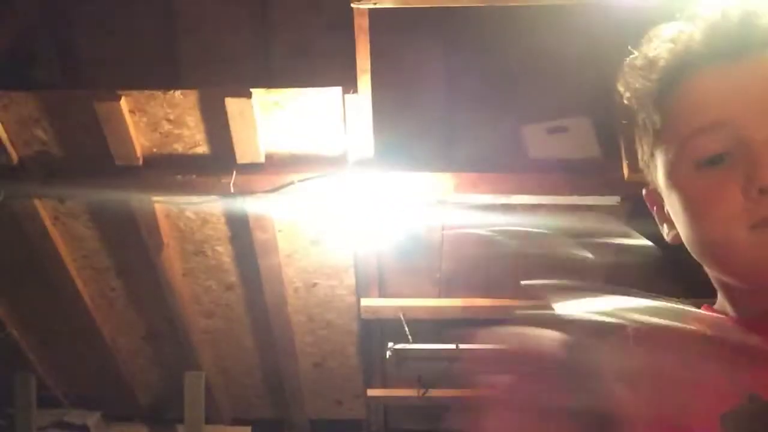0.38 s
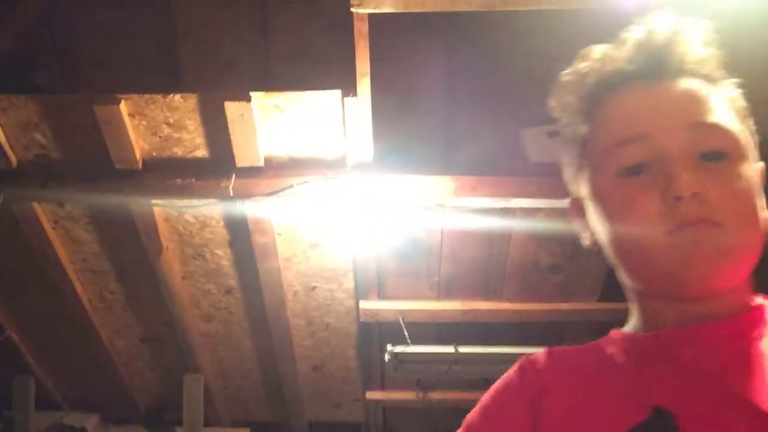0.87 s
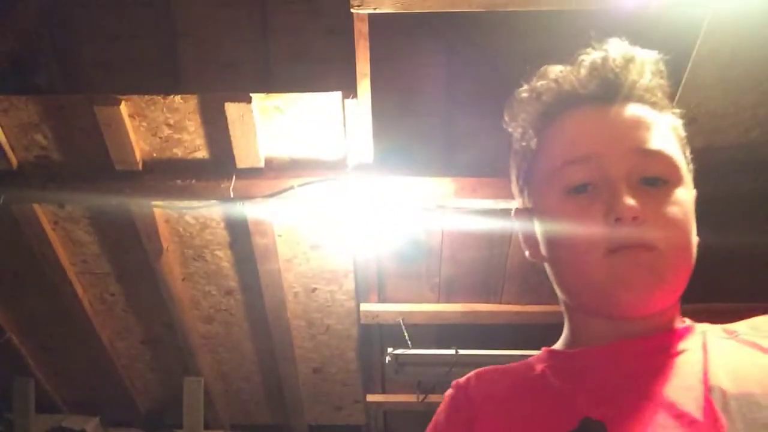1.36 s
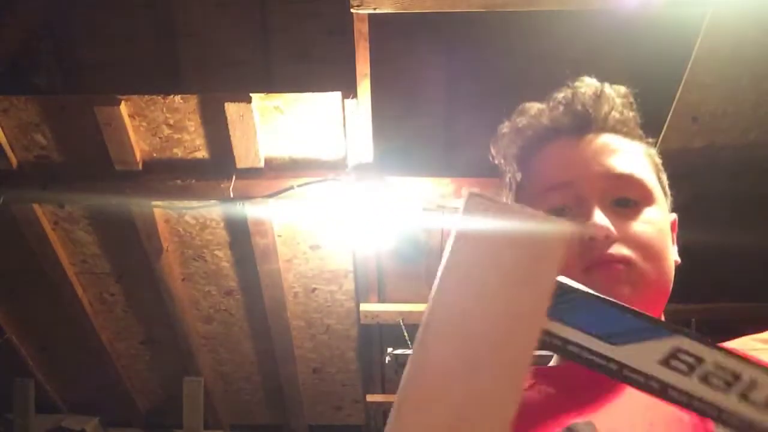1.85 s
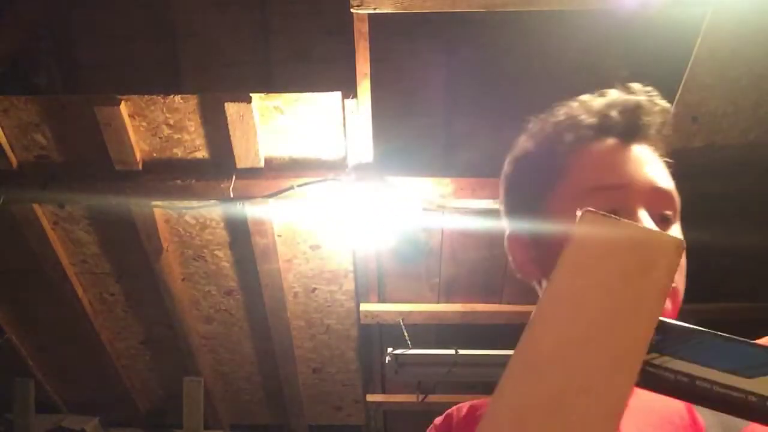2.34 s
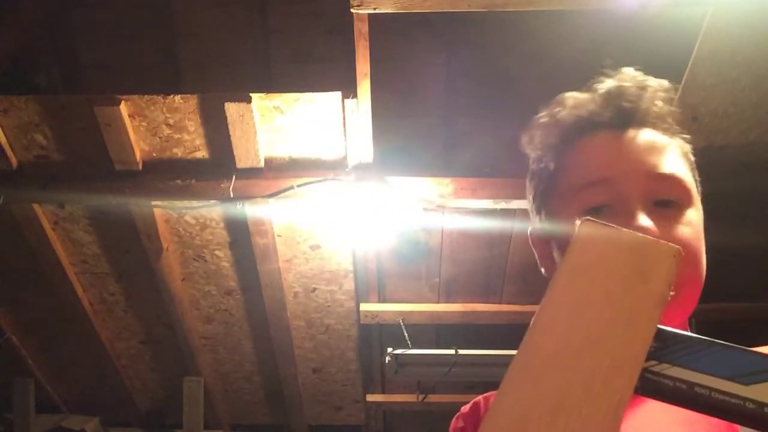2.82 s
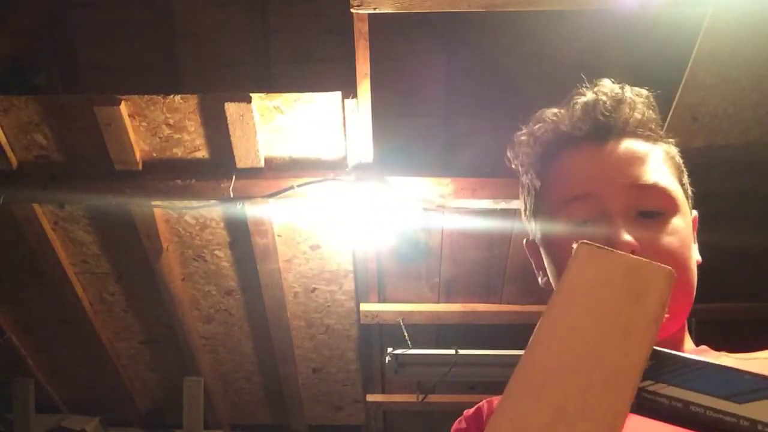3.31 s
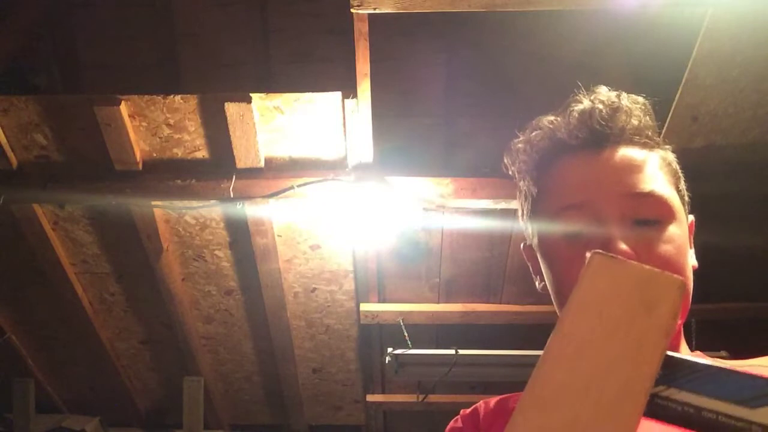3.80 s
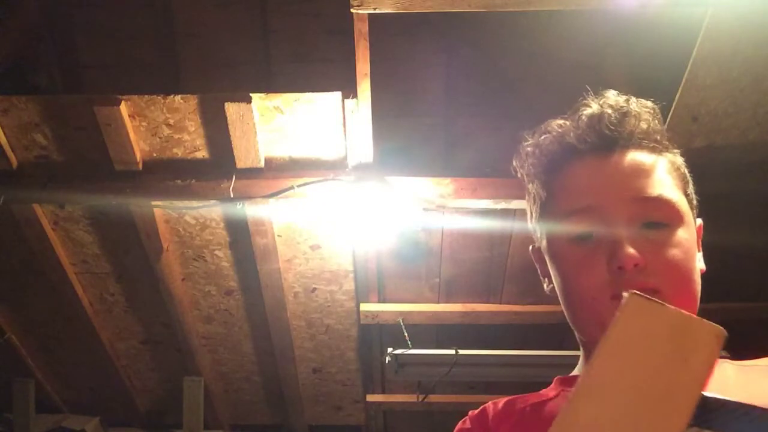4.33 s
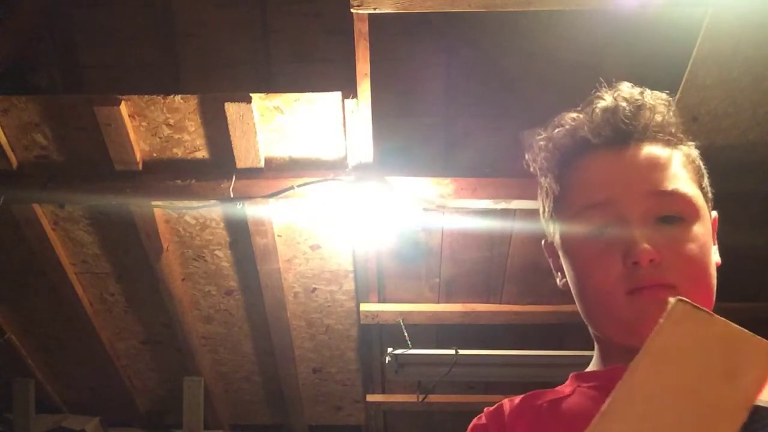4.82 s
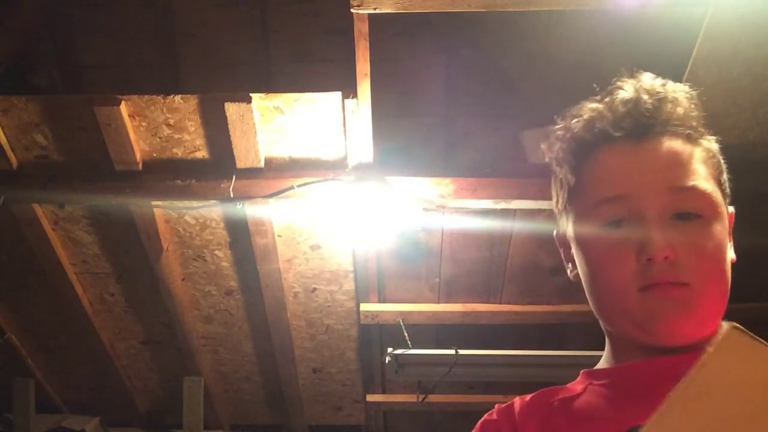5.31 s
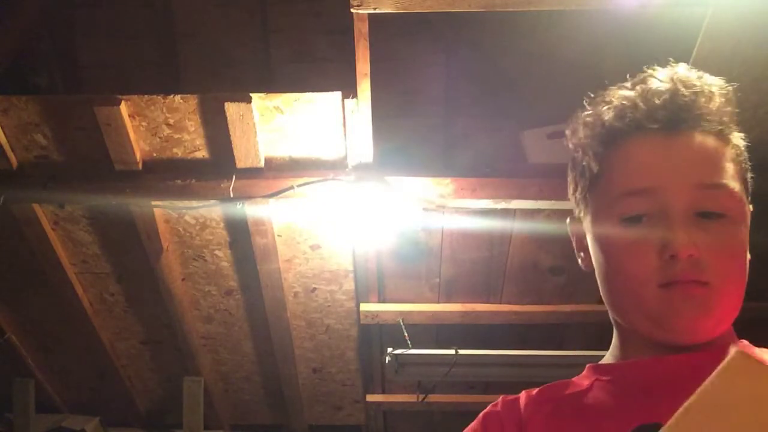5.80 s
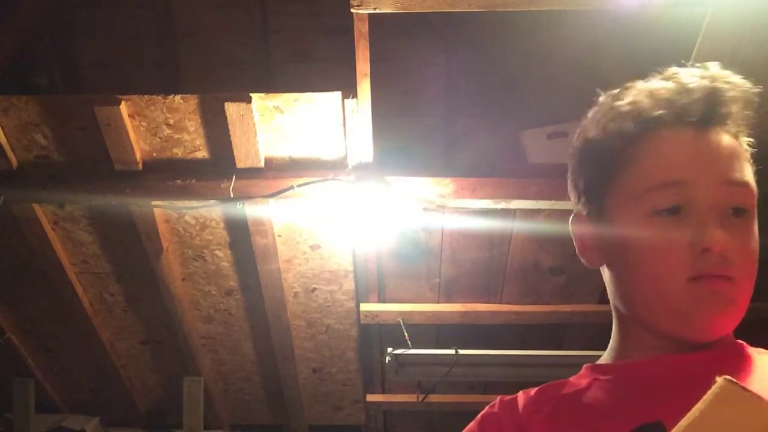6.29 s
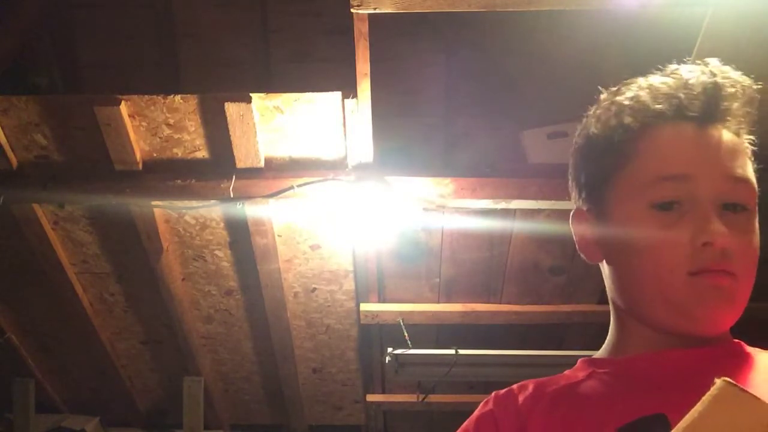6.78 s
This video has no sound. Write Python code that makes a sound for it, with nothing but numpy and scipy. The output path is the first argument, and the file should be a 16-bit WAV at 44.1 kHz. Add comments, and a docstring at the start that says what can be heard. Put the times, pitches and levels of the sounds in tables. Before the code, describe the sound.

A loud wooden knock starts immediately at 0.0 s, bouncing in fading hits until about 0.2 s with gritty rattle and high metallic ticks. A harder, brighter cluster cracks at 0.3-0.45 s, jangling away by 0.65 s. A light hollow ping comes near 0.8 s, then a third, heavier and duller cluster at 0.9-1.2 s, with bench thuds and weaker knocks around 1.3-1.4 s. Quiet rubbing and tiny taps follow; faint metal ticks and scraping at 2.15-2.3 s lead into a sharp, tight group of knocks at 2.35 s. Near silence until 3.5 s, then a small tap at 3.7 s, faint slides and padded bumps at 4.1-4.4 s, a soft thud at 5.05 s, light rubs, and a short slide ending in a clear double knock at 5.84 s. A tiny tap at 6.06 s, then only faint room air and low hum. Close, dry, short timber-room reverberation.

```python
"""A shaking bench is at once struck by knocks of a hammer and a wooden block, which bounce and rattle.
Blows and taps are sums of damped modes; rubbing and rattling drive the same modes with gritty noise.
A loose metal part ticks, a hollow handle pings and padded bumps thud as the block is rubbed and set down.
A timber workshop answers with decaying noise tails over faint air noise and a low hum."""
import sys
import numpy as np
from scipy import signal
from scipy.fft import rfft, irfft, next_fast_len
from scipy.io import wavfile
from scipy.ndimage import uniform_filter1d, minimum_filter1d, map_coordinates

SR = 44100
rng = np.random.default_rng(int(sys.argv[2]) if len(sys.argv) > 2 else 0)


def materialize(psi):
    """Save the field psi as 16-bit PCM at rate SR to the path in sys.argv[1].

    A 1-D psi becomes a single channel; in a 2-D psi each row is a channel.
    """
    bounded = np.clip(np.atleast_2d(psi).T, -1, 1)
    quanta = np.round(bounded * 32767).astype(np.int16)
    wavfile.write(sys.argv[1], SR, quanta)


def undo_db(level):
    """Turn decibels back into plain size, where 20 dB means ten times bigger."""
    steps = np.asarray(level, float) / 20
    return 10 ** steps


N = 315342

# contacts: (time [s], block peak [dB], bench thud [dB re block], upper-mode crack [dB re block],
# sizzle [dB re block, before its burst envelope])
CONTACTS = [(0.01, 0, -5.5, -7.5, -28.5), (0.047, -6.5, -7, -4, -19.5), (0.091, -12.5, -4.5, -8, -21.5),
            (0.104, -9, -7, -21.5, -25), (0.124, -16, -3, -10, -24), (0.171, -15, -5.5, -21, -32.5),
            (0.213, -22, -0.5, -5, -35), (0.293, -33.5, -25.5, 0, -23), (0.304, 1.5, -14, -1, -11),
            (0.343, 0, -6, -5, -28.5), (0.369, 6, -3.5, -4.5, -22.5), (0.412, -11, -12.5, -3, -16),
            (0.453, -4, -7, -16.5, -28.5), (0.516, -20.5, 3, -8.5, -26.5), (0.576, -24, 0.5, -6, -29),
            (0.636, -32.5, -30, 3.5, -34), (0.759, -32.5, -1, -9.5, -40.5), (0.886, -4.5, -2.5, -15.5, -34),
            (0.908, 1, -0.5, -13, -27), (0.952, 3, -6.5, -6.5, -22.5), (1.001, 2, -7.5, -12.5, -29.5),
            (1.03, -2, -12, -15, -35), (1.117, -13, -5.5, -16, -41.5), (1.137, -6.5, -9, -22.5, -47.5),
            (1.165, -11, -5.5, -18.5, -39), (1.224, -17.5, -3, -32, -43.5), (1.267, -29, -3, -24.5, -31.5),
            (1.32, -5.5, -8, -15.5, -41.5), (1.356, -10.5, -0.5, -39, -51.5), (1.381, -20, 10, -47, -61),
            (1.408, -13.5, -3, -32, -62), (1.533, -41.5, -6, -10, -28), (2.292, -52.5, -28, 12, -16.5),
            (2.336, -40.5, -23, 0, -30.5), (2.351, -41.5, -15, 8, -16), (2.359, -7, -4, -3.5, -33),
            (2.372, -5, -14.5, -19.5, -30.5), (2.384, -22, -20, -25, -23.5),
            (3.657, -40.5, -14, -16, -23.5), (3.708, -32.5, -1, -11, -31.5), (5.057, -36, 7.5, -20, -48),
            (5.721, -46, 15.5, -29, -26), (5.835, -4.5, -7.5, -27, -40), (5.841, -7, -13.5, -18.5, -20),
            (6.057, -44, -17, -28.5, -43.5)]
# modes of the wooden block: (frequency [Hz], relative level [dB], t60 [s])
BLOCK_MODES = [(299.5, -3.5, 0.032), (427, 2.5, 0.038), (483, -11.5, 0.023), (532, -5.5, 0.1),
               (685, -0.5, 0.015), (759, 0.5, 0.043), (857, -3.5, 0.062), (911, -4, 0.07),
               (1023.3, -5.5, 0.08), (1145, -6, 0.11), (1246.2, -2.5, 0.04), (1476, -12.5, 0.044)]
# low modes of the bench: (frequency [Hz], relative level [dB], t60 [s])
BENCH_MODES = [(78.6, -8, 0.19), (115.57, -6, 0.22), (159.4, 1.5, 0.086), (206.6, 6, 0.13),
               (247.4, 2, 0.059)]
# upper modes that hard contact wakes: (frequency [Hz], relative level [dB], t60 [s])
UPPER_MODES = [(1471, 0.5, 0.1), (1639, 2, 0.095), (1750, -4, 0.035), (1840, 4.5, 0.058), (2000, 2, 0.056),
               (2206, -1, 0.049), (2420, -2, 0.058), (2666, -11, 0.046), (2954, -10, 0.023),
               (3666, -18.5, 0.018)]
# spectrum of the sizzle and rubbing fizz: (frequency [Hz], relative density [dB per Hz])
FIZZ_SPECTRUM = [(1470, -29), (2500, -3.5), (2980, -9.5), (3440, -8), (4040, -8.5), (5440, -6.5),
                 (6150, -11.5), (7450, -14), (8480, -23), (9430, -26), (15500, -35.5)]


def unit(x):
    """Normalisation: a signal divided by its root mean square has rms 1."""
    return x / np.sqrt(np.mean(x ** 2) + 1e-20)


def along(points, hz):
    """Interpolation on a logarithmic frequency axis of (frequency [Hz], value) points."""
    f, v = np.transpose(points)
    return np.interp(np.log(hz + 1), np.log(f + 1), v)


def filtered(x, response):
    """Linear filtering: the spectrum of x is multiplied by a complex response of frequency."""
    m = next_fast_len(x.shape[-1] + 8192)
    spectrum = rfft(x, m) * response(np.fft.rfftfreq(m, 1 / SR))
    return irfft(spectrum, m)[..., :x.shape[-1]]


def resonant(modes, blur):
    """Modal superposition: steady forcing excites resonances whose bandwidth varies inversely with t60."""
    low, high = 1.2 * modes[0][0], 0.92 * modes[-1][0]

    def response(f):
        total = 0
        for k, (centre, db, t60) in enumerate(modes):
            width = blur * np.log(1000) / np.pi / t60  # Hz; blur scales the free-ringing width
            damping = 1j * f * width
            total = total + (-1) ** k * undo_db(db) * damping / (centre * centre - f * f + damping)
        inside = 1 / (1 + (f / high) ** 4) / (1 + (low / (f + 1)) ** 4)  # weak outside the modes' range
        return inside * total
    return response


def ring(modes, t, attack, scatter_db, detune, chatter=.001):
    """Impulse excitation: modes of scattered strength and pitch decay freely, blurred by contact chatter.
    attack is a time constant [s], detune a fraction, chatter a t60 [s]; the peak is 1."""
    hz, db, t60 = np.transpose(modes)[:, :, None]
    strength, pitch = rng.standard_normal((2, len(modes), 1))
    sign = (-1) ** np.arange(len(modes))[:, None]
    envelope = sign * undo_db(db + scatter_db * strength - 60 * t / t60)
    wave = envelope * np.sin(2 * np.pi * hz * (1 + detune * pitch) * t)
    contact = 0.07 * rng.standard_normal(len(t)) * undo_db(-60 * t / chatter)
    contact[0] = 1
    onset = 1 - np.exp(-t / attack)
    wave = signal.fftconvolve(wave.sum(0) * onset, contact)[:len(t)]
    return wave / np.abs(wave).max()


def grit(per_second, spread_db):
    """Stick-slip friction: random tiny contacts of uneven size stand on a bed of noise."""
    hit = rng.random(N) < per_second / SR
    size = undo_db(spread_db * rng.standard_normal(N)) * rng.standard_normal(N)
    return unit(hit * size) + 0.98 * rng.standard_normal(N)


def spells(rows, t, rise_db, release, grip=2499.5, upper_db=-4):
    """Power envelope: each spell sets in fast, changes evenly in dB and lets go, in all five parts.
    grip and release are slopes [dB/s]; parts are bench, low block, high block, upper modes and fizz."""
    power = np.zeros((5, N))
    for start, end, db, bench_db, fizz_db in rows:
        span = slice(max(round(start * SR) - SR // 10, 0), round(end * SR) + SR // 4)
        now = t[span]
        # a rising spell is levelled at its end, any other at its start
        along_spell = np.clip((now - start) / (end - start), 0, 1) - (rise_db > 0)
        before, after = np.maximum(start - now, 0), np.maximum(now - end, 0)
        shape_db = rise_db * along_spell - grip * before - release * after
        # the upper modes follow 0.29 of the fizz's change
        parts_db = np.array([[bench_db], [-2.5], [-3.5], [upper_db + 0.29 * fizz_db], [fizz_db]])
        power[:, span] += undo_db(db + parts_db + shape_db) ** 2
    return power


def rattle_power(t):
    """Exponential decay: loose parts lose the energy a knock left in bench, block, upper modes and fizz."""
    # bench, low block, high block, upper modes, fizz:
    # (rms level under that part of the knock [dB], decay [dB/s])
    decay_law = [(-14, 201), (-16, 210.5), (-18, 300), (-18.5, 261), (-7.5, 332)]
    power = np.zeros((5, N))
    under_db, dying = np.transpose(decay_law)[:, :, None]
    for s, db, thud_db, crack_db, sizzle_db in CONTACTS:
        span = slice(round(s * SR), round(s * SR) + SR // 2)
        start_db = db + np.array([[thud_db], [0], [0], [crack_db], [sizzle_db]]) + under_db
        power[:, span] += undo_db(start_db - dying * (t[span] - s)) ** 2
    return power


def rub_power(t):
    """Friction power under uneven hand pressure: strokes hold, slides swell and stop dead."""
    # even rubs or drags: (start [s], end [s], block level [dB], bench [dB re block], fizz [dB re block])
    strokes = [(.64, .75, -46.5, -0.5, -24), (.77, .86, -39, -1.5, -26.5), (1.19, 1.27, -35, 4, -48.5),
               (1.53, 1.575, -50.5, -7, -49), (1.6, 1.78, -57.5, 1.5, -44.5), (1.84, 1.97, -60, -8.5, -32),
               (1.98, 2.05, -68.5, -5.5, -2.5), (2.147, 2.225, -45, -5.5, -15),
               (2.226, 2.305, -46.5, -5, -23.5), (3.5, 3.64, -73.5, 5.5, -13.5),
               (3.665, 3.715, -63, 2, 7.5), (3.83, 3.855, -67.5, 4.5, 3.5), (4.135, 4.2, -63.5, 14.5, -18),
               (4.27, 4.31, -58, -5, -10.5), (4.32, 4.4, -58, 10.5, -19.5), (4.44, 4.58, -63.5, -9.5, -15),
               (4.66, 4.9, -62.5, 0.5, -14.5), (5.11, 5.24, -58.5, -4, -14.5),
               (5.3, 5.39, -58.5, -5.5, -17), (5.52, 5.645, -58.5, -0.5, -12), (5.715, 5.75, -56, 3, -28.5)]
    # slides: (start [s], end [s], block level at the end [dB], bench [dB re block], fizz [dB re block])
    slides = [(.282, .303, -33, 5.5, -10), (.845, .88, -36, 10, -22.5), (1.68, 1.825, -64.5, 3.5, 2.5),
              (3.9, 4.125, -55, -0.5, -18), (4.96, 5.055, -51.5, 12, -18), (5.745, 5.832, -35, 4, -16.5)]
    held = spells(strokes, t, rise_db=0, release=502.5)
    swelling = spells(slides, t, rise_db=17.5, release=2502)
    waver = map_coordinates(rng.standard_normal(1000), [t * 25])  # 25 random points per second
    return (held + swelling) * undo_db(1.5 * waver) ** 2


def rubbing():
    """Forced vibration: slips and loose parts drive the modes without pause; shaken or rubbed tools sizzle."""
    # where rubbed wood fizzes most: (frequency [Hz], width [Hz], level [dB, before an 8 dB lift])
    grain = [(3390, 230, 1), (7260, 56, 1.5), (5110, 59, -1.5), (5460, 100, -11.5), (5700, 220, 0),
             (6330, 130, -6), (9000, 130, -7.5), (10300, 170, -8.5), (10400, 220, -10)]
    # shaking left by heavy blows:
    # (start [s], end [s], block level at the start [dB], bench [dB re block], fizz [dB re block])
    shakes = [(0, .2, -8, 4, -17), (.305, .52, -9, -9.5, -15.5), (.887, 1.05, -12.5, 2.5, -28)]
    # spectrum of shaken metal: (frequency [Hz], relative density [dB per Hz])
    metal_spectrum = [(4000, -21), (8000, 5), (11000, -2), (15500, -9.5)]

    def fizz(f):
        peaks = sum(undo_db(db + 8) / (1 + ((f - c) / w * 2) ** 2) for c, w, db in grain)
        return undo_db(along(FIZZ_SPECTRUM, f)) * (1 + peaks)

    layers = [filtered(grit(300, 3), resonant(BENCH_MODES, blur=.9)),
              filtered(grit(600, 3), resonant(BLOCK_MODES[:7], blur=.9)),
              filtered(grit(600, 3), resonant(BLOCK_MODES[7:], blur=.9)),
              filtered(grit(800, 3), resonant(UPPER_MODES, blur=.8)),
              filtered(grit(2000, 3), fizz)]
    t = np.arange(N) / SR
    shake = spells(shakes, t, rise_db=-24, release=249.5, grip=SR, upper_db=-3.5)
    rub = rub_power(t)
    power = rattle_power(t) + rub + shake
    gain = uniform_filter1d(np.sqrt(power), size=130, axis=1, mode="nearest")
    driven = sum(g * unit(x) for g, x in zip(gain, layers))
    tools = unit(filtered(grit(3000, 2.5), lambda hz: undo_db(along(metal_spectrum, hz))))
    tools_gain = np.sqrt(shake[-1] + undo_db(1.5) ** 2 * rub[-1])  # follows the fizz
    return driven + undo_db(-8.5) * tools_gain * tools


def air():
    """Stationary random noise: shaped, slightly patchy room noise and a wavering narrow-band hum."""
    # room noise: (frequency [Hz], relative density [dB per Hz])
    room_spectrum = [(15, -62), (25, -25.5), (39, -14.5), (62, 1.5), (86, -10.5), (204, -14.5), (233, -17),
                     (281, -13.5), (340, -26), (368, -20.5), (761, -21.5), (1490, -33), (1710, -29),
                     (2620, -40), (15500, -50.5)]
    # hum: (frequency [Hz], 1/e half-width [Hz], rms level [dB])
    hum_bands = [(55, 6.8, -62)]
    z = signal.stft(rng.standard_normal(N), nperseg=512)[2]
    field = uniform_filter1d(rng.standard_normal(z.shape), 6, 0)  # smooth over frequency
    field = uniform_filter1d(field, 14, 1)  # then over time
    noise = signal.istft(z * undo_db(0.6 * unit(field)), nperseg=512)[1][:N]
    out = undo_db(-57) * unit(filtered(noise, lambda hz: undo_db(along(room_spectrum, hz))))
    for hz, width, db in hum_bands:
        hum = filtered(rng.standard_normal(N), lambda f: np.exp(-((f - hz) / width) ** 2))
        out += undo_db(db) * unit(hum)
    return out


def knocks():
    """Impact: each contact rings block and bench, with upper modes and a sizzle burst when hard."""
    out, t = np.zeros(N + SR), np.arange(SR // 4) / SR
    hiss = unit(filtered(rng.standard_normal(N + SR), lambda hz: undo_db(along(FIZZ_SPECTRUM, hz))))
    # a blow lifts the block modes over 900 Hz by 1 dB
    struck = [(hz, level + (hz > 900) * 1, t60) for hz, level, t60 in BLOCK_MODES]
    burst = 1.5 * undo_db(-60 * t / .02) + .4 * undo_db(-60 * t / .11)  # fast and slow decay
    for s, db, thud_db, crack_db, sizzle_db in CONTACTS:
        at = round(s * SR)
        blow = ring(struck, t, 0.00026, scatter_db=4.5, detune=0.017, chatter=0.062)
        thud = ring(BENCH_MODES, t, 0.002, scatter_db=4.5, detune=0.003, chatter=0.04)
        crack = ring(UPPER_MODES, t, 0.000072, scatter_db=3.5, detune=0.039, chatter=0.034)
        sizzle = burst * hiss[at:at + len(t)]
        blow += undo_db(thud_db) * thud + undo_db(crack_db) * crack + undo_db(sizzle_db) * sizzle
        out[at:at + len(t)] += undo_db(db) * blow
    return out[:N]


def shop(x):
    """Reverberation: walls return noise tails that decay by frequency, new every 1/8 s as things move."""
    # reverberation: (frequency [Hz], t60 [s])
    decay_times = [(100, 0.08), (400, 0.1), (1500, 0.32), (5000, 0.065), (12000, 0.6)]
    out, step = np.zeros(N + 2 * SR), SR // 8
    for at in range(0, N, step):
        hz, t, z = signal.stft(rng.standard_normal(SR // 2), SR, nperseg=256)
        decay = undo_db(-60 * t / along(decay_times, hz)[:, None])
        tail = signal.istft(z * decay, SR, nperseg=256)[1]
        wet = signal.fftconvolve(x[at:at + step], tail / np.linalg.norm(tail))
        out[at + 300:][:len(wet)] += wet  # 300 samples of travel time
    return out[:N]


def ticks():
    """Free vibration of a small stiff body: a loose metal part, shaken or handled, rings short and high."""
    # ticks: (time [s], peak level [dB])
    tick_times = [(0.0614, -19), (0.0814, -19.5), (0.1064, -18.5), (0.1244, -19.5), (0.1394, -31.5),
                  (0.1544, -25.5), (0.1694, -27), (0.1854, -34.5), (0.1994, -45.5), (0.3825, -18.5),
                  (0.4174, -28.5), (0.4648, -24.5), (0.4714, -26), (0.4998, -34.5), (0.5174, -34),
                  (0.5766, -43), (0.6214, -44.5), (2.145, -50), (2.164, -48.5), (2.183, -48.5),
                  (2.1994, -50), (2.2644, -51), (2.2887, -59.5)]
    # modes of the metal part: (frequency [Hz], relative level [dB], t60 [s])
    part_modes = [(5360, 0, 0.022), (6050, -5, .02), (7800, -9, 0.03), (9300, -0.5, .012),
                  (9900, -3.5, 0.0083), (10700, -4.5, 0.014)]
    out, t = np.zeros(N + SR), np.arange(SR // 10) / SR
    for s, db in tick_times:
        tick = ring(part_modes, t, .0008, scatter_db=0.5, detune=0.011)
        out[round(s * SR):][:len(t)] += undo_db(db) * tick
    return out[:N]


def pings():
    """Beating: a soft tap on the hollow handle rings close modes that die fast over a small wooden click."""
    # taps: (time [s], handle peak [dB])
    handle_taps = [(0.783, -13.5), (1.575, -27.5), (1.902, -30)]
    # modes of the handle: (frequency [Hz], relative level [dB], t60 [s])
    handle_modes = [(653.4, -11.5, 0.06), (780, -3, 0.1), (670, -27.5, 1), (735, -34, 0.64)]
    out, t = np.zeros(N + SR), np.arange(SR // 2) / SR
    for s, db in handle_taps:
        tap = ring(handle_modes, t, .006, scatter_db=1, detune=.003)
        tap += undo_db(-20) * ring(UPPER_MODES, t, .001, scatter_db=3, detune=.03, chatter=.05)
        tap += undo_db(-7.5) * ring(BLOCK_MODES, t, .002, scatter_db=2, detune=.016, chatter=.06)
        out[round(s * SR):][:len(t)] += undo_db(db) * tap
    return out[:N]


def bumps():
    """Damped oscillation: a padded contact swells over a cycle or two and sags in pitch as the bench settles."""
    # soft pushes and padded bumps:
    # (time [s], level before the swell [dB], starting frequency [Hz], t60 [s])
    soft_contacts = [(0.873, 4, 195, .035), (2.184, -21, 430, 0.092), (2.347, -5.5, 171, 0.081),
                     (3.703, -25.5, 443, 0.12), (3.713, -37, 113.6, 0.5), (4.076, -27, 200, 0.12),
                     (4.139, -13, 128, 0.044), (4.169, -19, 99.3, 0.063), (4.315, -30.5, 211, 0.044),
                     (4.341, -17, 127, 0.067), (4.397, -22, 103, 0.063), (5.053, -24, 246.5, 0.073),
                     (5.054, -18, 427, 0.024), (5.069, -20, 101.3, 0.11), (5.797, -18, 210, 0.1)]
    out, t = np.zeros(N + SR), np.arange(SR // 4) / SR
    for s, db, hz, t60 in soft_contacts:
        swell = (1 - np.exp(-t * hz / 2.2)) * undo_db(db - 60 * t / t60)
        out[round(s * SR):][:len(t)] += swell * np.sin(2 * np.pi * hz * t * (1 - 0.83 * t))
    return out[:N]


def scene():
    """Superposition: the bench sounds, their reverberation and the room noise add linearly."""
    bench = rubbing() + knocks() + ticks() + pings() + bumps()
    return (bench + undo_db(-24.5) * shop(bench) + air())[None]


def roll_off(x):
    """The treble ends steeply here."""
    return signal.sosfilt(signal.butter(12, 15640, fs=SR, output="sos"), x)


def record(dry):
    """Peak limiting: a fast gain reduction holds the peaks near 0.99 of full scale."""
    need = 1 / np.maximum(1, np.abs(dry) / .99)
    held = minimum_filter1d(need, size=160, axis=1)
    gain = uniform_filter1d(held, size=80, axis=1)
    return roll_off(dry * gain)


dry = scene()
out = record(dry)
materialize(out)
```